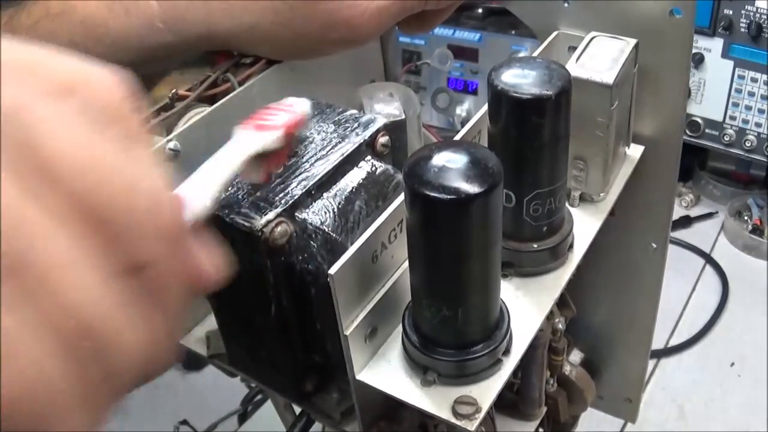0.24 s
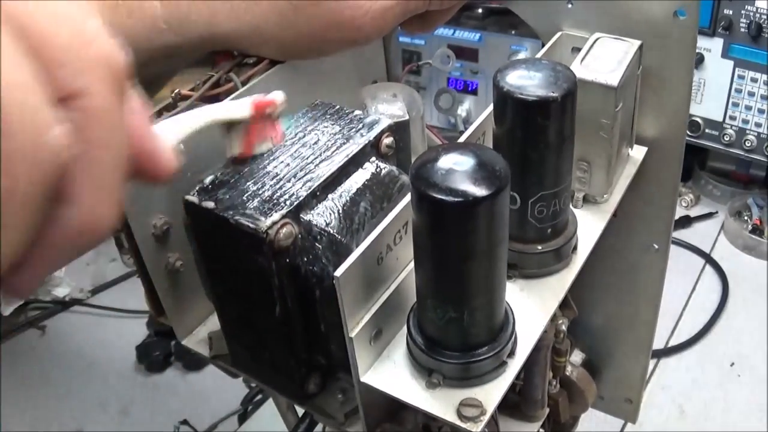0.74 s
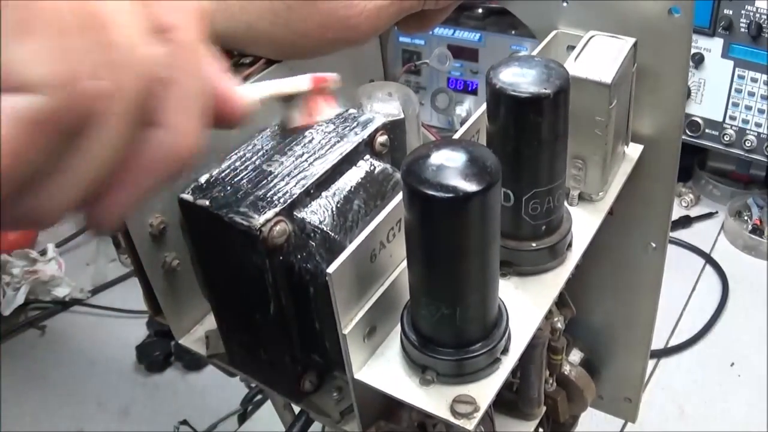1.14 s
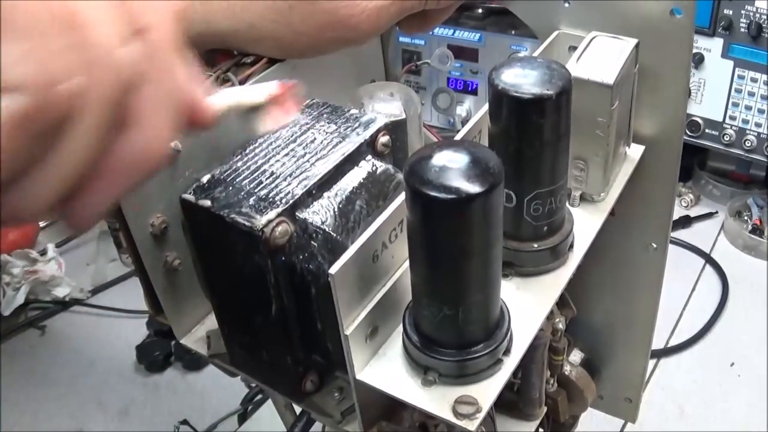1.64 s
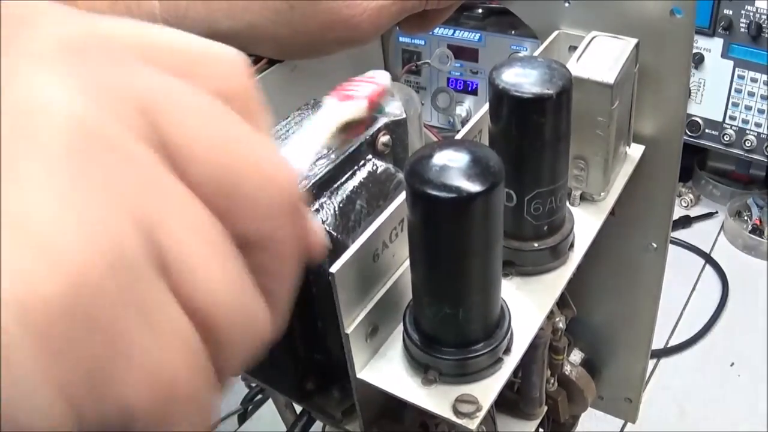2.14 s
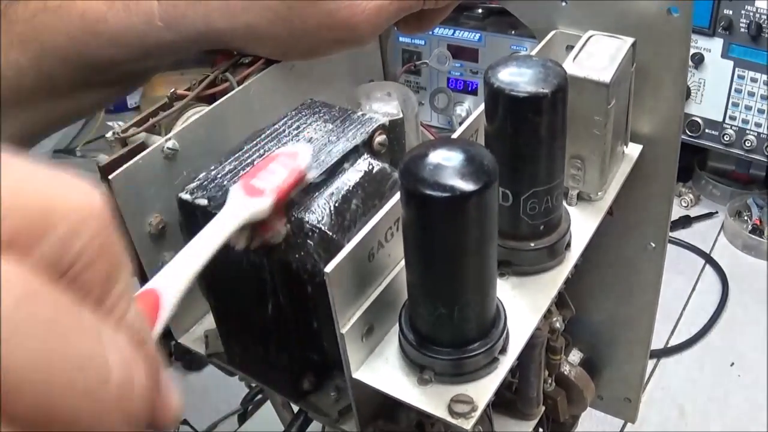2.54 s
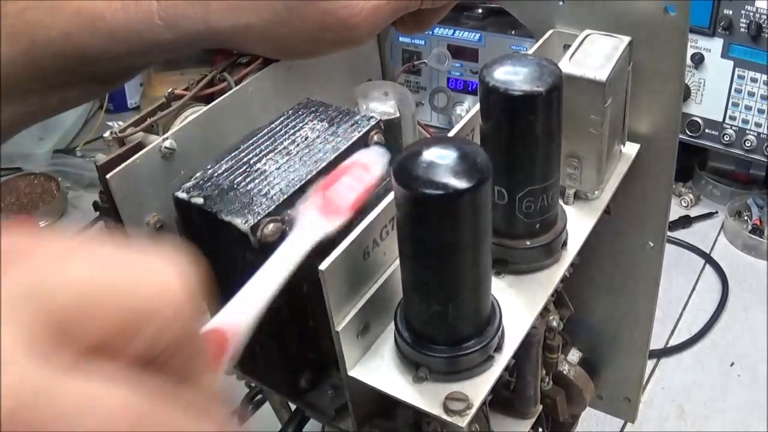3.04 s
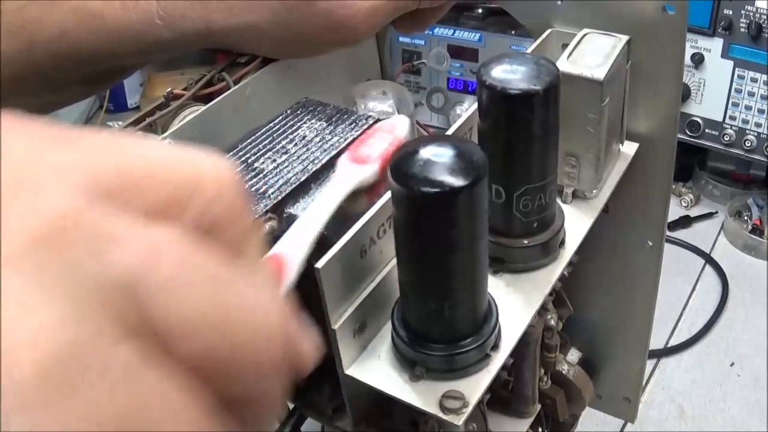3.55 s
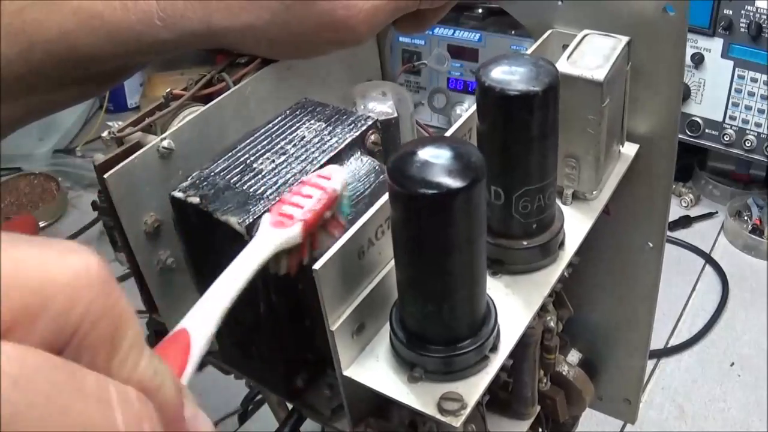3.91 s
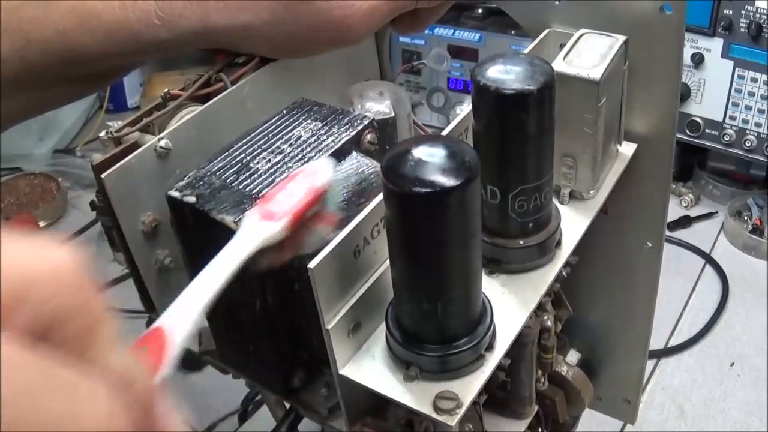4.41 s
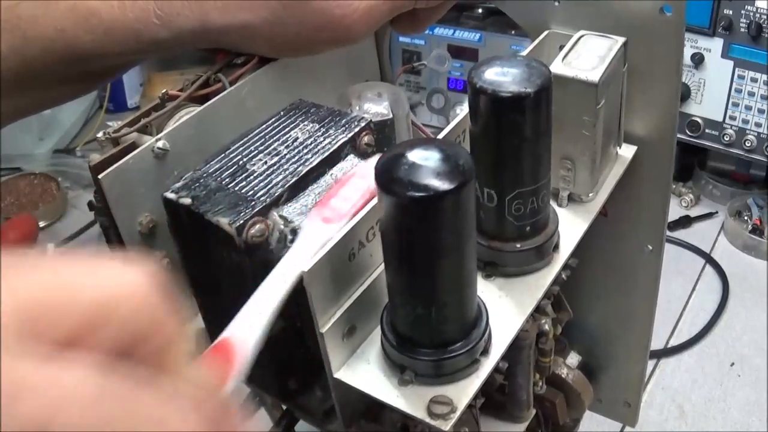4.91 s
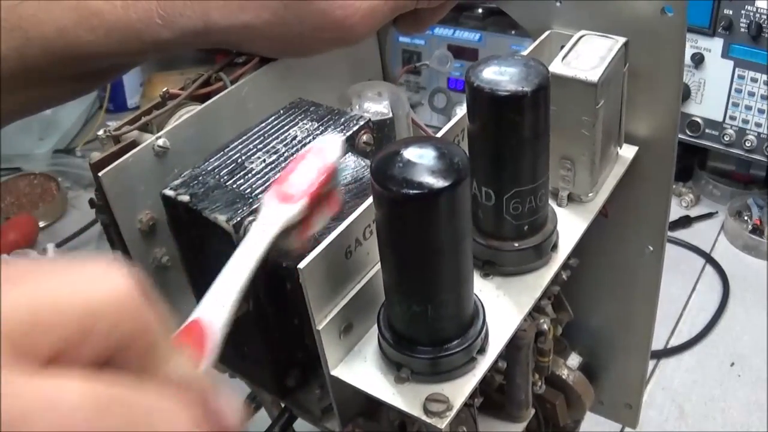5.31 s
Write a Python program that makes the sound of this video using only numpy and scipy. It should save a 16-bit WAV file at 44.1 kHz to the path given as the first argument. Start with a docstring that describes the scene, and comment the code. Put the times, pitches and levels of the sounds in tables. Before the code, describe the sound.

Close up, a toothbrush scrubs a dusty metal cover for about five and a half seconds without pause, in seven or eight quick strokes a second. Each stroke is a short, bright, dry scratch of dense tiny bristle clicks, swelling and dipping at the turn, with push and pull unequal in strength. Through the first 1.3 seconds, scattered sharp ticks snap from stiff bristles, and soft low thuds come from the chassis. From 1.5 to 2.3 the brushing is mostly crisp and hissy, then a little fuller around 2.4, with small hollow bumps. A hard plastic clack strikes metal at 3.25, another at 3.8, and more chatter near 4.6 to 4.95 and 5.5. From about 3.6 the strokes ring more metallically, with brief pitched rasps at 4.25, 4.5, 4.95 and 5.45. Faint ventilation and very slight hum lie behind; the room is small, with short reflections.

```python
"""A toothbrush scrubs the dusty cover of a transformer on a metal chassis, seven or eight strokes a second, up close.
At each turn the bristles bend, flick free and slip: dense tiny clicks, filtered directly and through the cover's ring.
Lone bristles tick and tufts sing (short bursts of noise); the plastic head chatters on the metal (ringing sines
and noise). The chassis thuds dully, and a small workroom hums faintly behind (filtered noise and sines)."""
import sys
import numpy as np
from scipy import signal
from scipy.fft import rfft, irfft, next_fast_len
from scipy.io import wavfile

SR = 44100
rng = np.random.default_rng(int(sys.argv[2]) if len(sys.argv) > 2 else 0)


def wrap_up_sound(samples):
    """Save the sound to the file named by the first command line argument, as 16-bit audio."""
    columns = np.atleast_2d(samples).T
    # keep every value between -1 and 1, then stretch to whole-number steps
    tamed = np.clip(columns, -1, 1)
    steps = np.round(tamed * 32767).astype(np.int16)
    wavfile.write(sys.argv[1], SR, steps)


N = 245584  # length in samples

# The colour of slipping bristles. Each row: frequency in Hz, level in dB.
BRISTLE_COLOUR = [(150, -23.5), (450, -27.5), (850, -23.5), (1500, -16.5), (2800, -10.5), (4900, -7.5),
                  (6400, 1.5), (7200, -0.5), (7700, -1.5), (9300, 0.5), (10400, -3), (12000, -8.5),
                  (16000, -26)]


def undb(db):
    """Turn decibels into gain."""
    return 10 ** (np.asarray(db) / 20)


def unit(x):
    """Scale a sound to an average (rms) level of 1."""
    return x / np.sqrt(np.mean(x ** 2))


def colour(x, points):
    """Filter a sound by an outline of (Hz, dB) points."""
    hz, db = np.transpose(points)
    size = next_fast_len(len(x), real=True)
    f = np.maximum(np.fft.rfftfreq(size, 1 / SR), 1)
    gain = undb(np.interp(np.log(f), np.log(hz), db))
    return irfft(rfft(x, size) * gain, size)[:len(x)]


def resonate(x, hz, width):
    """Pass a sound through one resonance, with gain 1 at its centre."""
    return signal.lfilter(*signal.iirpeak(hz, hz / width, fs=SR), x)


def walk(rate):
    """Wander smoothly at random, through this many points a second, with rms 1."""
    knots = np.clip(rng.standard_normal(N // 50), -2, 2)
    return unit(np.interp(np.arange(N) / SR * rate, np.arange(len(knots)), knots))


def follow(t, points):
    """Read a slowly moving setting from its (seconds, value) points."""
    return np.interp(t, *np.transpose(points))


def slips(rate, spread_db):
    """Tiny clicks of uneven size, so many a second; the rate may move, and the mean power is 1."""
    share = np.clip(rate / SR, 1e-4, 1)
    size = undb(spread_db * np.clip(rng.standard_normal(N), -3, 3))
    clicks = (rng.random(N) < share) * size * rng.choice([-1, 1], N)
    # sparser clicks are made larger to keep the level even
    return unit(clicks / np.sqrt(share))


def add(track, s, sound):
    """Mix a sound into a track at a time in seconds."""
    i = int(s * SR)
    track[i:i + len(sound)] += sound[:N - i]


def motion(t, flick_s=0.013, stop_s=0.0098, bend_s=0.013, loop_s=0.05):
    """Friction strength and speed of the brush, whose slanted tufts dig in one way and glide back."""
    # Push and pull strokes in turn. Each row: turn in seconds, sliding level in dB,
    # place of top speed within the stroke from 0 to 1.
    stroke_rows = [(-.035, -17, 0.46), (.101, -20.5, 0.62), (0.239, -17.5, 0.5), (.38, -22, 0.4),
                   (0.517, -16.5, 0.66), (0.638, -17.5, 0.47), (.762, -15, 0.63), (0.895, -19, 0.63),
                   (1.017, -17, 0.54), (1.155, -18.5, 0.52), (1.274, -19.5, 0.66), (1.408, -19.5, 0.4),
                   (1.523, -19, .45), (1.647, -18.5, 0.4), (1.777, -17, 0.53), (1.908, -16.5, 0.54),
                   (2.046, -17, 0.61), (2.202, -15.5, 0.43), (2.326, -14.5, 0.48), (2.471, -13.5, 0.49),
                   (2.607, -15.5, 0.5), (2.741, -14.5, 0.44), (2.884, -19, 0.45), (3.022, -13.5, 0.54),
                   (3.152, -21.5, 0.9), (3.287, -21, 0.7), (3.429, -22, 0.44), (3.565, -16.5, 0.49),
                   (3.697, -18.5, 0.5), (3.838, -17, 0.49), (3.974, -21.5, 0.54), (4.105, -16, 0.62),
                   (4.233, -18.5, 0.58), (4.364, -15, 0.56), (4.492, -17, 0.52), (4.627, -15.5, 0.53),
                   (4.759, -19, 0.64), (4.901, -18.5, 0.49), (5.032, -19.5, 0.43), (5.174, -17.5, 0.51),
                   (5.305, -19.5, .62), (5.432, -18.5, 0.55), (5.554, -17.5, 0.5)]
    # Slant of the tufts, which flips as the hand swings round. Each row: time in seconds,
    # slant (no unit; +1 means pulls dig in and pushes glide, -1 the reverse).
    slant_rows = [(0, 0.83), (.9, 1), (2.3, 0.57), (2.9, -0.59), (4, -0.29), (5.5, -1.03)]
    # Turns where the brush swings round without stopping. Each row: time in seconds, rustle level in dB.
    loop_rows = [(1.524, -28.5), (1.779, -27.5), (3.023, -29.5), (4.103, -36)]
    glide_swell, dig_swell = 1.59, 0.8  # friction grows as this power of speed
    glide_flick_db, dig_flick_db = -34, -4  # against the sliding level
    turn_rustle_db = -42.5  # tufts still stirring at a turn

    turn, slide_db, crest = np.transpose(stroke_rows)
    gaps = np.diff(turn)
    k = np.clip(np.searchsorted(turn, t) - 1, 0, len(turn) - 1)  # which stroke
    length = np.append(gaps, np.mean(gaps))[k]
    age = t - turn[k]
    slant = follow(turn[k], slant_rows)
    dig = np.clip((1 - (-1) ** k * slant) / 2, 0, 1)  # 0 glides, 1 digs in

    def blend(gliding, digging):
        """Move between the gliding and the digging value."""
        return gliding + dig * (digging - gliding)

    place = np.clip(age / length, 0, 1)
    top = np.clip(crest[k], .1, .9)
    rise_and_fall = np.where(place < top, place / top, (1 - place) / (1 - top))
    speed = np.abs(np.sin(np.pi / 2 * rise_and_fall))
    # nothing slides while the tufts bend over at either end
    sliding = 1 - np.exp(-(np.minimum(age, length - age) / stop_s) ** 2)
    slide = speed ** blend(glide_swell, dig_swell) * sliding
    # then they let go together
    free = np.maximum(age - bend_s, 0) / flick_s
    flick = undb(blend(glide_flick_db, dig_flick_db)) * free * np.exp(1 - free)
    rustle = undb(turn_rustle_db)
    for s, db in loop_rows:
        rustle = rustle + undb(db) * np.exp(-np.abs(t - s) / loop_s)
    strength = np.hypot(undb(slide_db[k]) * np.hypot(slide, flick), rustle)
    return strength, speed


def bristle_slips(rate):
    """Bristles catch and slip in a crackle, while tufts of different free length each favour a pitch."""
    crackle = slips(rate, spread_db=5.0) + undb(-9.0) * slips(rate=220, spread_db=7.0)
    tufts = np.zeros(N)
    for hz in np.geomspace(3300, 13500, 16):
        # tufts take turns, so the colour shifts inside a stroke
        turns = undb(3.5 * walk(40))
        tufts += turns * resonate(slips(rate / 5, spread_db=3), hz, hz / 14)
    return unit(colour(crackle + undb(-2.5) * unit(tufts), BRISTLE_COLOUR))


def tip_fizz(rate):
    """The finest slips, at the very tips of the bristles, make a high fizz."""
    # Colour of the fizz. Each row: frequency in Hz, level in dB.
    tip_colour = [(3000, -43), (7000, -25), (9500, 7.5), (11000, 2), (12500, -3), (15500, -5)]
    return unit(colour(slips(rate, spread_db=9), tip_colour))


def cover_ring(t, rate):
    """The slipping bristles push the cover and chassis, which ring at their own resonances."""
    # Resonances under the bristles. Each row: frequency in Hz, width in Hz, level in dB.
    cover_rows = [(1146, 15, -21), (1640, 68, -24), (2027, 96, -13), (2600, 580, -11), (3106, 81, -6),
                  (3410, 260, -8.5), (3866, 143, 2), (4177, 127, 0.5), (4415, 65, 1.5), (4614, 400, 0),
                  (6070, 1560, -2.5), (7230, 990, -1)]
    # Tilt of the ring about 4 kHz, levelling off below 2.6 kHz.
    # Each row: time in seconds, tilt in dB per octave downwards.
    tilt_rows = [(0, -13), (.9, 15), (2, 3), (3.5, -5.5), (4.2, -1), (5.5, -1.5)]
    push = slips(rate, spread_db=7)
    tilt = follow(t, tilt_rows)
    ring = np.zeros(N)
    for k, (hz, width, db) in enumerate(cover_rows):
        # each resonance is fed more or less as the brush travels over the cover
        feed_db = db + 3.4 * walk(22) + tilt * np.log2(4000 / max(hz, 2600))
        # neighbours ring with opposite sign
        ring += undb(feed_db) * resonate(push, hz, width) * (-1) ** k
    return colour(unit(ring), [(300, -14), (1100, 5.0), (2000, 1.0), (7000, 0), (12000, 2)])


def brush(t):
    """Bristle slips, denser with speed, heard directly and through the cover."""
    # The cover answers more towards its rim than its middle. Each row: time in seconds, ring level in dB.
    ring_rows = [(0, -7.5), (.45, -6.5), (.8, -21), (1.5, -16), (2, -17), (2.4, -8.5), (2.8, -6),
                 (3.1, -13), (3.6, -4), (4, 0.5), (4.8, -1.5), (5.5, 2)]
    # Level of the fizz at the bristle tips. Each row: time in seconds, level in dB.
    fizz_rows = [(0, -8.5), (.5, -8), (1.1, -10), (1.6, -7), (2, -6), (2.35, -17), (2.8, -10), (3.4, -3),
                 (3.68, -28), (3.9, -8.5), (4.4, -16), (4.75, -30), (5, -11), (5.5, -10)]
    strength, speed = motion(t)
    grip = strength * undb(1.06 * walk(130))  # tufts catch and release
    rate = 2000 + 12000 * speed  # slips a second
    ring = undb(follow(t, ring_rows)) * cover_ring(t, rate)
    fizz = undb(follow(t, fizz_rows)) * tip_fizz(rate)
    return grip * (bristle_slips(rate) + ring + fizz)


def workroom(t):
    """Steady ventilation is filtered noise, and mains hum is a few plain tones."""
    # Colour of the room and its ventilation. Each row: frequency in Hz, level in dB.
    air_colour = [(20, -27), (35, -8), (55, 1), (90, -3.5), (140, -3), (210, -4.5), (420, -3), (800, -8),
                  (2000, -3.5), (6000, -10.5), (16000, -48)]
    # Mains hum. Each row: frequency in Hz, level in dB.
    hum_rows = [(118.4, -62), (360.7, -63.5)]
    out = undb(-42.5) * unit(colour(rng.standard_normal(N), air_colour))
    for hz, db in hum_rows:
        out += undb(db) * np.sqrt(2) * np.sin(2 * np.pi * hz * t)
    return out


def reflections(x, t60, gap_s=0.0014):
    """Dense early echoes of the bench and walls: fading noise with the energy of the direct sound."""
    t = np.arange(SR // 3) / SR
    tail = rng.standard_normal(len(t)) * undb(-60 * t / t60) * (t > gap_s)
    return signal.fftconvolve(x, tail / np.linalg.norm(tail))[:N]


def snaps(decay_s=0.0012):
    """Lone stiff bristles snap free with sharp ticks: very short bursts of noise."""
    # Sharp ticks, most of them strong and one faint. Each row: time in seconds, level in dB.
    snap_rows = [(.133, -6.5), (.143, -14), (.278, -10), (.428, -9), (.595, -11), (.667, -8.5), (0.94, -10),
                 (1.1, -8), (1.198, -5), (1.218, -27), (1.295, -13), (3.719, -13)]
    out, t = np.zeros(N), np.arange(SR // 50) / SR
    for s, db in snap_rows:
        noise = unit(colour(rng.standard_normal(len(t)), BRISTLE_COLOUR))
        add(out, s, undb(db) * noise * np.exp(-t / decay_s))
    return out


def bumps():
    """The chassis rocks and shifts on the bench with hollow thuds: fading noise around a low pitch."""
    # Dull bumps. Each row: start in seconds, level in dB, pitch in Hz, decay in seconds.
    bump_rows = [(.361, -41.5, 126, .075), (.433, -34, 594, .02), (.45, -45, 467, 0.44),
                 (.92, -41, 133, 0.047), (1.17, -42, 123, 0.04), (2.289, -34, 438, 0.0086),
                 (2.369, -29.5, 448, 0.0076), (2.4, -43.5, 470, .12), (2.5, -34, 450, 0.043),
                 (2.935, -38.5, 427, 0.048), (3.869, -35, 105, 0.029), (4.255, -31, 440, 0.0086),
                 (4.624, -35, 50, 0.039), (4.63, -37.5, 340, 0.023), (4.91, -40, 54.8, .05)]
    out, t = np.zeros(N), np.arange(SR // 2) / SR
    for s, db, hz, decay in bump_rows:
        noise = rng.standard_normal(SR)
        # keep the end, where the resonances have settled
        body = unit(resonate(resonate(noise, hz, 0.69 * hz), hz, hz))[-len(t):]
        onset = 1 - np.exp(-t / (0.073 * decay))
        add(out, s, undb(db) * body * np.exp(-t / decay) * onset)
    return out


def rasps(rasp_s=0.069):
    """A few tufts catch on a ridge, fall into step and sing briefly around one pitch."""
    # Singing tufts. Each row: start in seconds, pitch in Hz, width in Hz, level in dB.
    rasp_rows = [(1.435, 4660, 700, -30), (2.373, 4030, 900, -20.5), (2.772, 6440, 160, -22),
                 (4.245, 3200, 900, -24), (4.511, 4035, 599, -20.5), (4.937, 4020, 450, -18),
                 (5.459, 3140, 985, -18.5)]
    out, size = np.zeros(N), int(rasp_s * SR)
    for s, hz, width, db in rasp_rows:
        noise = rng.standard_normal(SR // 2)
        tone = unit(resonate(resonate(noise, hz, width), hz, width))
        add(out, s, undb(db) * tone[-size:] * np.hanning(size))
    return out


def knock_blow(t, hard_db, modes):
    """One blow: the struck parts ring, the handle raps dully and the contact cracks."""
    hz, mode_db, t60 = modes
    size, detune, phase = rng.standard_normal((3, len(hz), 1))  # a slightly different spot each time
    # a harder blow feeds the high modes more
    gain = undb(mode_db + hard_db * (hz > 3000) + 1.16 * size - 60 * t / t60)
    pitch = hz * (1 + .015 * detune)
    ring = unit(np.sum(gain * np.sin(2 * np.pi * (pitch * t + phase)), axis=0))
    contact = rng.standard_normal(len(t)) * np.exp(-t / 0.0039)
    crack = unit(resonate(contact, 5000, 3000))
    # the handle's dull rap
    clack = unit(colour(contact, [(800, -32), (1300, 1.0), (2300, 5.5), (3200, -19)]))
    return ring + undb(-6) * clack + undb(-13 + hard_db) * crack


def knocks(chatter_hz=330):
    """The hard head skips over the metal in a short run of blows, each on a slightly different spot."""
    # Brush head against the metal. Each row: start in seconds, level in dB,
    # chatter length in seconds, hardness in dB.
    knock_rows = [(2.515, -26.5, 0.0096, -10), (3.252, -14.5, 0.023, 9), (3.298, -30, 0.021, -3),
                  (3.787, -21, 0.0085, 5), (3.7921, -14, 0.018, 5), (4.603, -18, 0.0024, -16),
                  (4.822, -15, 0.0096, -1.5), (4.848, -19, 0.0237, -3.5), (4.914, -25.5, 0.02, -4),
                  (4.956, -25, 0.025, 9), (5.48, -25.5, 0.018, 5)]
    # What a knock rings. Each row: frequency in Hz, level in dB, time to fade by 60 dB in seconds.
    mode_rows = [(900, -13, 0.12), (1188, -5.5, 0.2), (1356, -18, 0.13), (1514, 1, 0.028), (1700, 0, 0.023),
                 (1963, -2, 0.074), (2108, 0.5, 0.21), (2540, -3.5, 0.074), (2740, -13, 0.12),
                 (3730, 3.5, 0.023), (4040, 7, 0.025), (4250, 10, 0.039), (4340, -9, 0.038),
                 (4660, 13, 0.045), (4980, 1, 0.075), (5720, -17, .02)]
    out, t = np.zeros(N), np.arange(SR // 5) / SR
    hz, mode_db, t60 = np.transpose(mode_rows)[:, :, None]
    # the pressing hand damps every mode within 140 cycles
    t60 = np.minimum(t60, 140 / hz)
    for s, db, length, hard_db in knock_rows:
        run = np.zeros(len(t))
        for k in range(int(length * chatter_hz) + 1):
            when = (k + rng.uniform(0, 0.96) * (k > 0)) / chatter_hz
            blow = knock_blow(t, hard_db, (hz, mode_db, t60))
            # the first blow is the hardest
            force = (1.6 if k == 0 else 1) * np.exp(-.5 * when / length)
            i = int(when * SR)
            run[i:] += force * blow[:len(t) - i]
        loudness = np.std(run[:int((length + .004) * SR)])
        add(out, s, undb(db) * run / loudness)
    # so small a head radiates no bass
    return signal.sosfilt(signal.butter(2, 550, "high", fs=SR, output="sos"), out)


def scene():
    """The scrubbing sits near the middle, its treble a little to the left; near reflections widen it."""
    # Colour of the stereo width, thin around 3 kHz, against the direct sound.
    # Each row: frequency in Hz, level in dB.
    width_colour = [(40, -48), (125, -19), (500, -9), (1200, -11), (2400, -25), (3300, -34.5),
                    (4300, -18.5), (8000, -20), (10000, -13.5), (12500, -38)]
    # The treble leans left, in the end less as the hand moves down. Each row: time in seconds, lean in dB.
    lean_rows = [(0, 2.5), (1.7, 5.5), (2.3, -5), (5.5, -7.5)]
    t = np.arange(N) / SR
    direct = brush(t) + workroom(t) + snaps() + bumps() + rasps() + knocks()
    mid = direct + undb(-15.5) * reflections(direct, t60=0.3)
    treble = colour(direct, [(100, -48), (3000, -60), (4500, -34), (8000, -17.5), (12500, -37)])
    lean = treble * undb(follow(t, lean_rows))
    side = colour(reflections(direct, t60=0.24), width_colour) + lean
    return np.array([mid + side, mid - side])  # left, right


def record(dry):
    """The recorder rounds the highest peaks and cuts the top above 15750 Hz."""
    rounded = dry / (1 + (dry / .9) ** 6) ** (1 / 6)
    return signal.sosfilt(signal.ellip(12, .1, 80, 15750, fs=SR, output="sos"), rounded)


dry = scene()
out = record(dry)
wrap_up_sound(out)
```